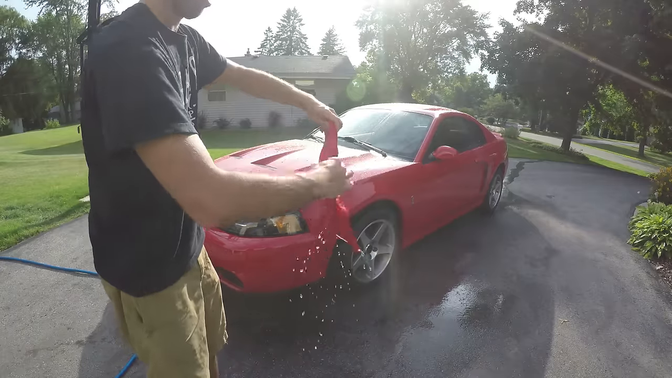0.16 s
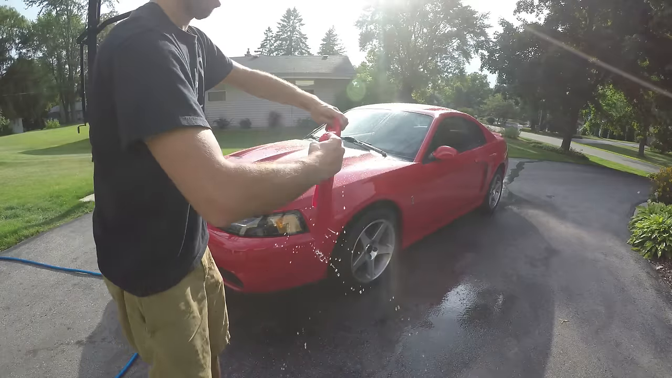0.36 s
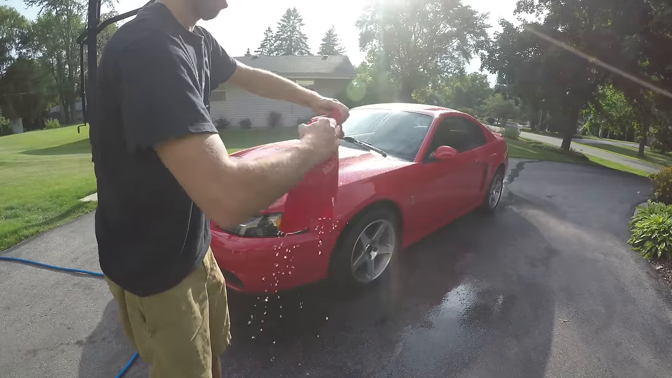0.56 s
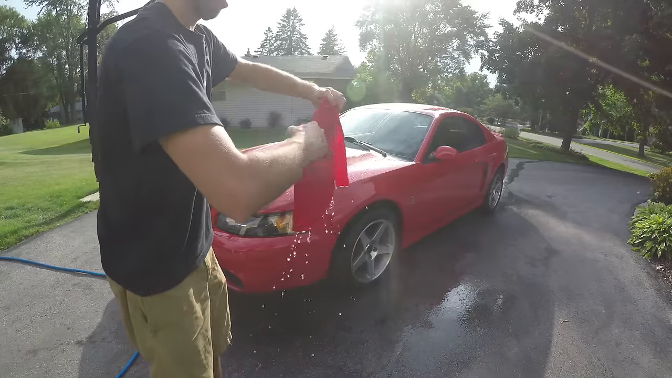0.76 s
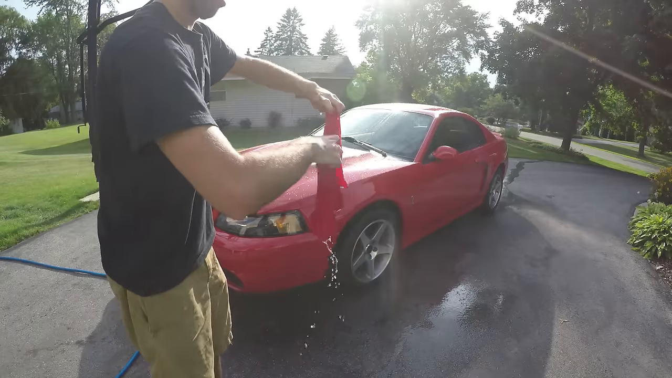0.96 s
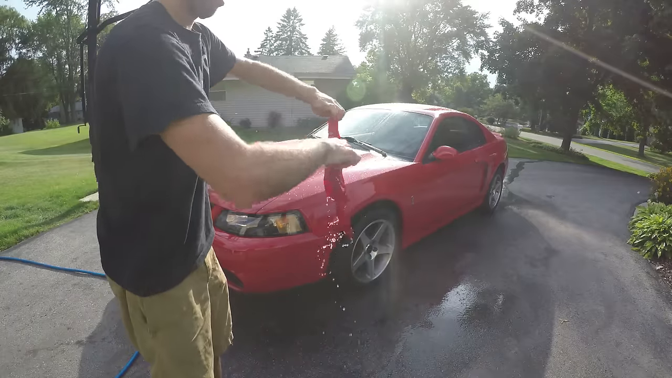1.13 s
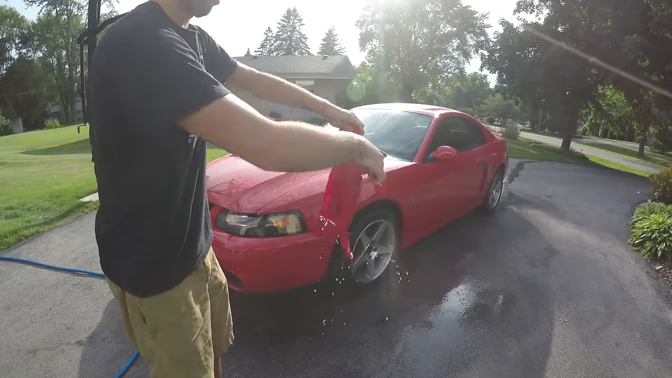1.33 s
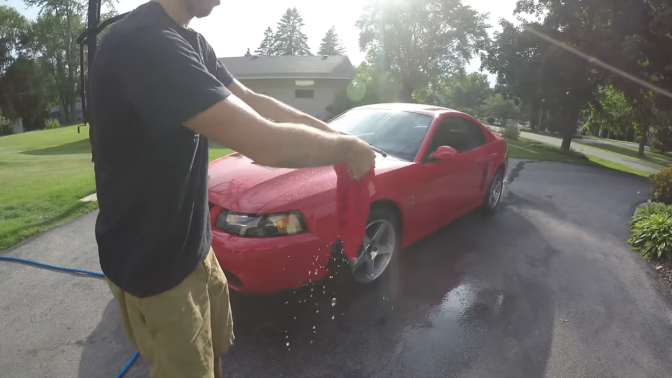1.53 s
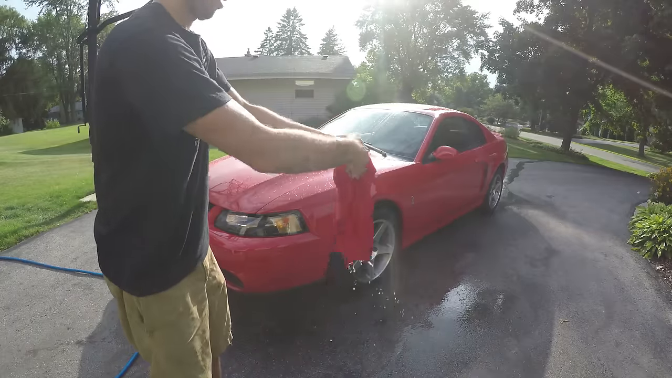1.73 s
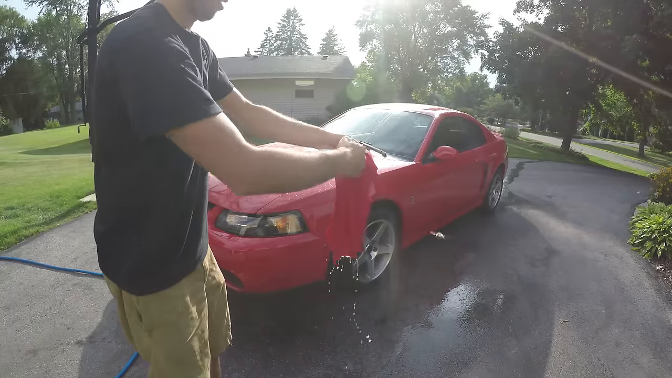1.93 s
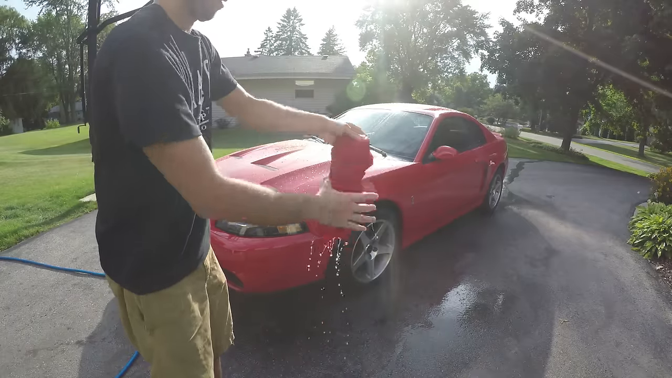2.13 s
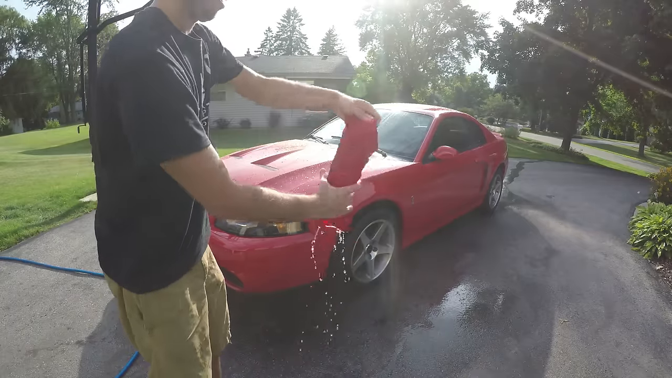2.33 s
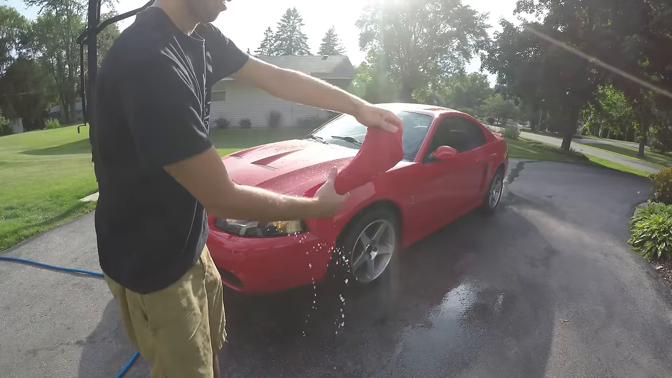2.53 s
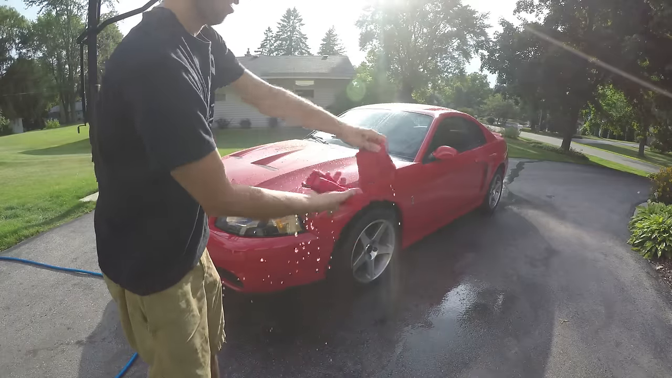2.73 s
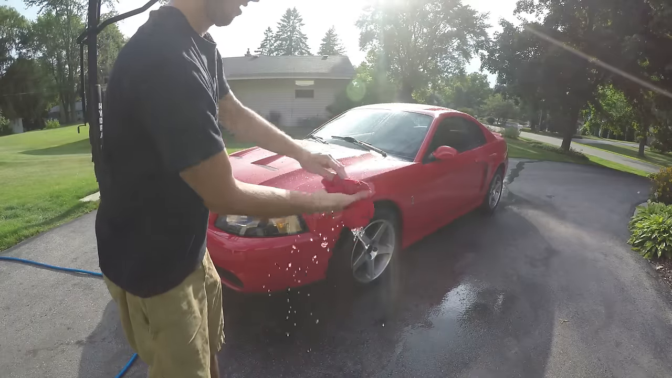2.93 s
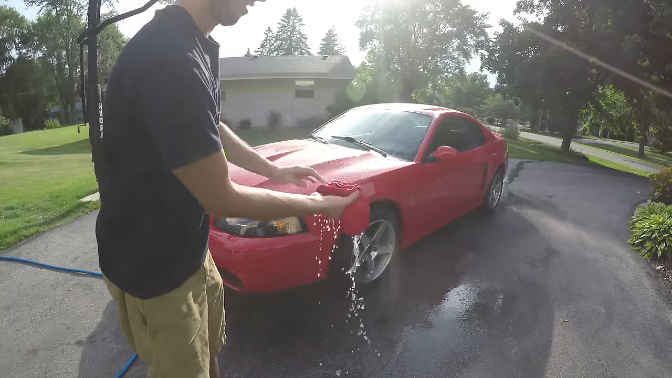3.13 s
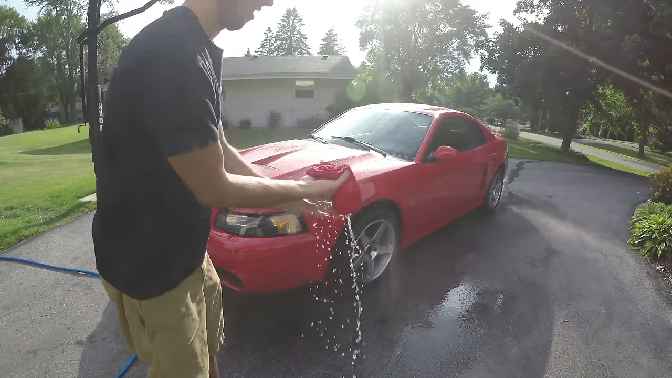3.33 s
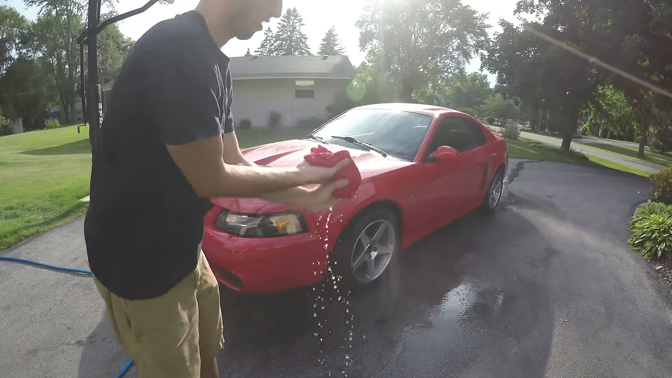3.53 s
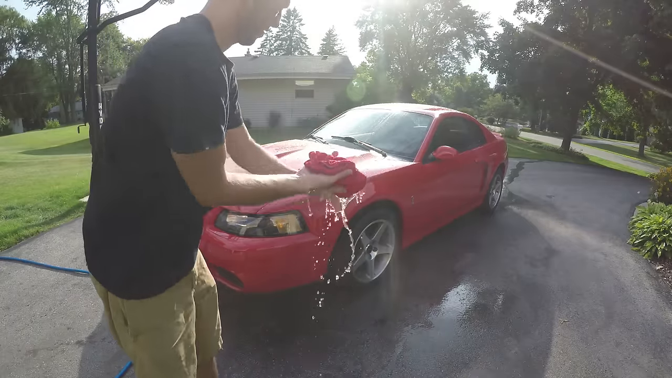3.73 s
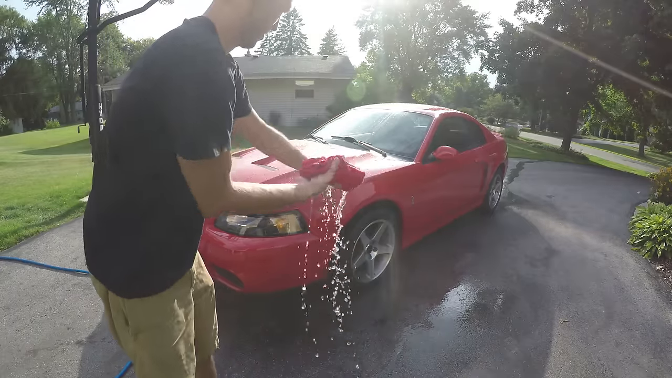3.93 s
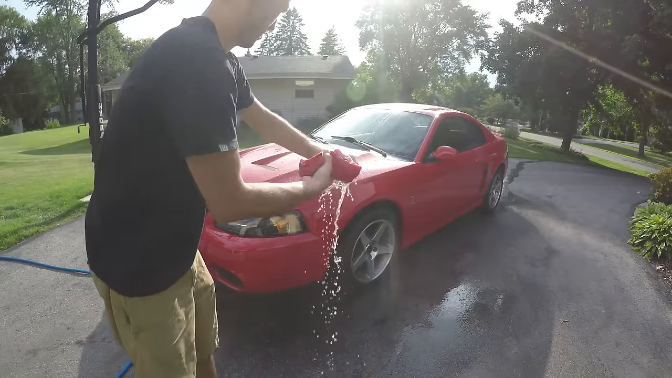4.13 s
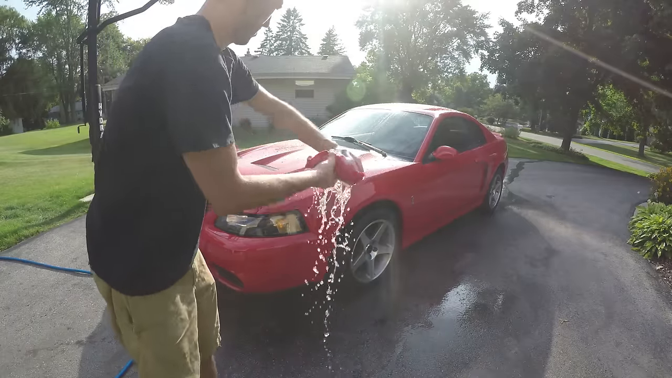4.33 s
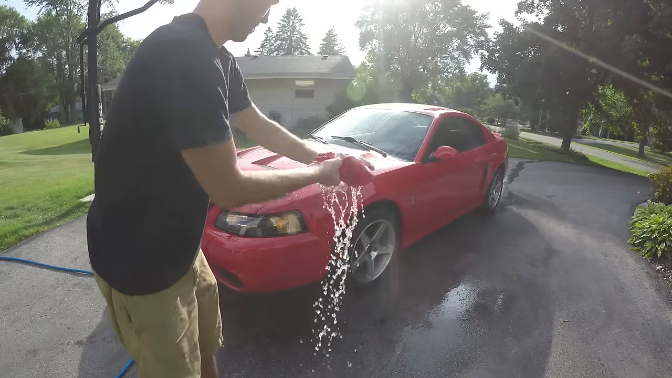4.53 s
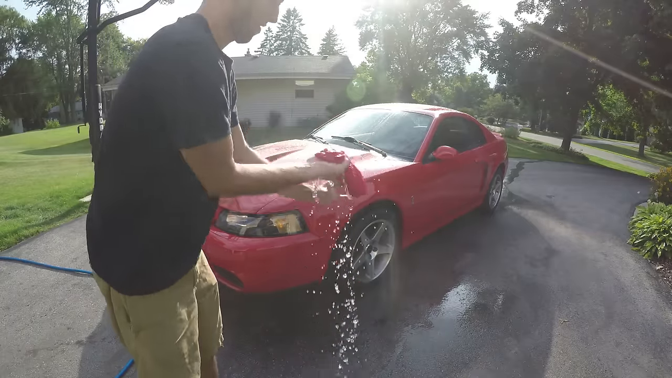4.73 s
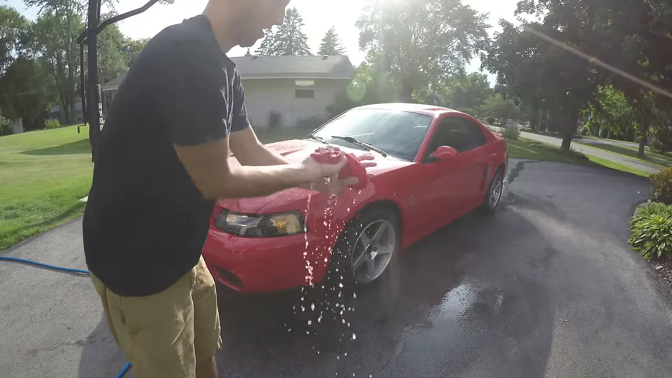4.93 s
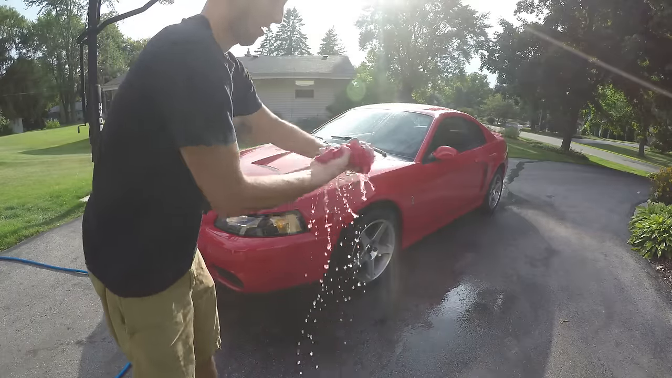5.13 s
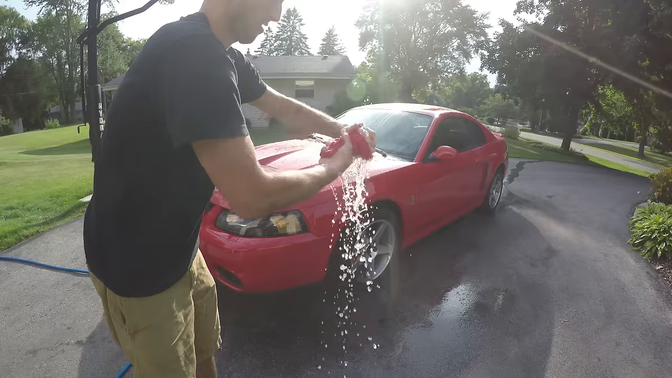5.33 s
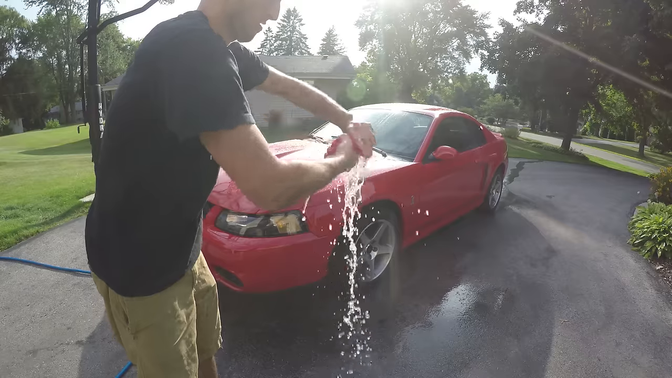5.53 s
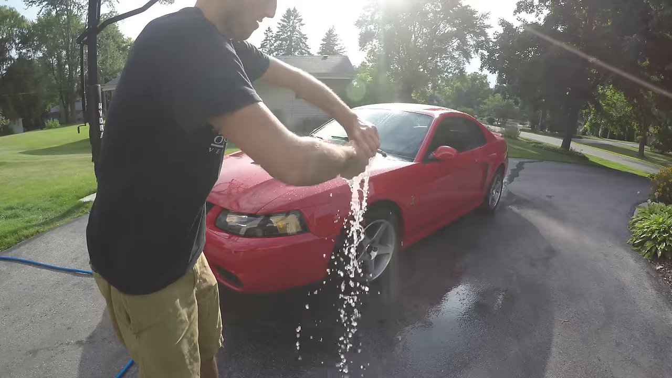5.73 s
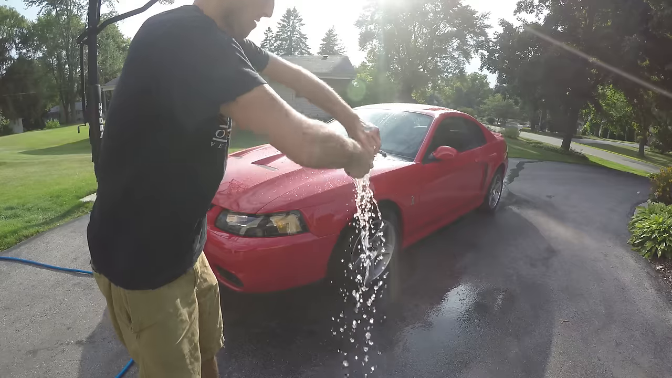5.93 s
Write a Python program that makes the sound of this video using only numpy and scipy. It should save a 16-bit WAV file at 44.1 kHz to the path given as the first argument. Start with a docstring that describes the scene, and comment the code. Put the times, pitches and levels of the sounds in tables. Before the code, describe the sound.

Water wrung from a soaked towel builds from single crisp drips to dense splashing bursts on a wet driveway outdoors.

```python
"""On a wet driveway in a suburb, a soaked towel is wrung out two metres away, with a car just behind.
Drops striking the water film are rising chirps with a spit of filtered-noise spray; trapped bubbles are
decaying rings. Squeezes swell random drops and a fine hiss to a stream, amid cloth squelches. The car flank
and ground return echoes. Far off, two engines of harmonic partials speed up over noise-band drones,
a thin hum, faint chirps, breeze puffs and a suburban murmur of shaped noise."""
import sys
import numpy as np
from scipy import signal
from scipy.fft import rfft, irfft
from scipy.io import wavfile
from scipy.ndimage import uniform_filter1d

SR = 44100
rng = np.random.default_rng(int(sys.argv[2]) if len(sys.argv) > 2 else 0)


def to_wav(sig):
    """Store sig (one row per channel, or 1-D mono) as 16-bit WAV at the path in sys.argv[1].

    Samples outside -1..1 are clipped; the rate is SR.
    """
    pcm = np.clip(np.atleast_2d(sig), -1, 1) * 32767
    pcm = np.round(pcm).astype(np.int16)
    wavfile.write(sys.argv[1], SR, pcm.T)  # frames by channels


N = 263718
T = np.arange(N) / SR  # s
GRAIN = 512  # samples in one drop or bubble

# running water: drive of the full stream and of the steady drip, slopes of a squeeze
FULL_FLOW_DB, DRIP_DB = -45, -72.5
SWELL_DB_PER_S, EBB_DB_PER_S = 137, 98
# loud drops: delay from contact to loudest moment
CONTACT_TO_PEAK_S = 0.001204
# a drop lasts longer the lower it rings (ms at 8 kHz, factor per octave down, random spread in octaves of time)
LENGTH_MS, LENGTH_PER_OCTAVE, LENGTH_SCATTER = .36, 1.3, .3
# spray bands against the band at the ring pitch: level at the reference balance, dB per dB of balance
SPIT_DB, SPIT_PER_TREBLE = -3.0, 1.1  # reference treble 18 dB under the peak
BODY_DB, BODY_PER_LOW = -13.0, 0.89  # reference lows 28 dB under the peak
BUBBLE_T60_S = 0.016
YARD_DB, YARD_T60_S = -12.5, 0.22  # energy of the wash against the direct sound, decay time
MID_DB, SIDE_DB = -60, -58  # suburb before its slow swell: half-sum and half-difference of the ports
LEFT_DB = 1.23  # left port raised and right port lowered by this much
TOP_HZ = 15800  # upper limit of the pickup


def undb(db):
    """Amplitude ratio from decibels: a factor of ten for every 20 dB."""
    return 10 ** (np.asarray(db) / 20)


def level(x, db):
    """Normalization: scales the root-mean-square amplitude to a level in dB."""
    return x * undb(db) / np.sqrt(np.mean(x ** 2, axis=-1, keepdims=True))


def white():
    """Flat spectrum: the transform of uncorrelated Gaussian noise."""
    return rfft(rng.standard_normal(N))


def coloured(spectrum, noise):
    """Spectral shaping: weights a noise transform by (hz, level_db) points, straight in log frequency."""
    hz, db = np.transpose(spectrum)
    f = np.arange(N // 2 + 1) * SR / N + 1e-9
    return irfft(noise * undb(np.interp(np.log(f), np.log(hz), db)), N)


def walk(rate):
    """Slow random modulation: Gaussian levels held 1 / rate s and smoothed twice."""
    k = int(SR / rate)
    steps = np.repeat(rng.standard_normal(N // k + 1), k)
    return uniform_filter1d(uniform_filter1d(steps, k), k)[:N]


def window(start, end, edge=0.018):
    """Amplitude envelope: a linear fade in over one edge and out over two."""
    return np.clip(np.minimum((T - start) / edge, (end - T) / (2 * edge)), 0, 1)


def scatter(s, grains):
    """Superposition: adds one-port or two-port grains at their times."""
    out = np.zeros((2, N + GRAIN))
    starts = np.clip((s * SR).astype(int), 0, N)
    for start, grain in zip(starts, grains):
        out[:, start:start + GRAIN] += grain
    return out[:, :N]


def splashes(s, db, hz, body_db, spit_db, length_ms):
    """Drop impact: the closing crater chirps upward, spray crackles round it and fizzes out."""
    noise = rng.standard_normal(size=(len(s), 3, GRAIN))
    pan_db = 2.5 * rng.standard_normal(len(s))
    t = np.arange(GRAIN) / SR
    rise = 1.6 * np.clip(length_ms, .1, 3)[:, None] / 1000
    x = t / rise
    swell = (x * np.exp(1 - x)) ** 4  # greatest at x = 1
    hz = hz[:, None]
    # pitch climbs from well under the ring pitch and passes it just after the swell peaks
    pitch = np.minimum(hz * (0.3143 + 0.6226 * x), .42 * SR)
    chirp = swell * np.sin(2 * np.pi * np.cumsum(pitch, axis=1) / SR)

    octave = np.log2(np.arange(1, GRAIN // 2 + 2) * SR / GRAIN)

    def bump(centre_hz, width_octaves):
        """Resonance-like band: a Gaussian hump in log frequency."""
        return np.exp(-.5 * ((octave - np.log2(centre_hz)) / width_octaves) ** 2)

    body = undb(body_db)[:, None] * bump(3080, 0.8)
    spit = undb(spit_db)[:, None] * bump(12040, 0.37)
    colour = bump(hz, 0.71) + body + spit
    fizz = undb(-13) * np.exp(-t / .0045)
    # the spray comes late in the rise, once the crown breaks up
    shape = swell * np.minimum(x, 1) ** 2 + fizz * np.minimum(x, 1) ** 3
    spray = level(irfft(rfft(noise) * colour[:, None], GRAIN), -1) * shape[:, None]
    # one spray is common to both ports, the other two belong to one port each
    ports = (1.13 * chirp + spray[:, 0])[:, None] + 0.78 * spray[:, 1:]
    ports = ports / np.abs(ports.mean(axis=1)).max(axis=1)[:, None, None]
    port_db = db[:, None] + np.outer(pan_db, [.5, -.5])
    return scatter(s - rise[:, 0], ports * undb(port_db)[..., None])


def loud_drops():
    """Scaling of impact sound: among drops that stand out singly, a lower ring lasts longer."""
    # drops before panning, low cut and echoes: contact_s, peak_db, ring_hz,
    # treble_db (balance above 10 kHz, re peak), low_db (balance below 3 kHz, re peak)
    drops = [(0.022, -40, 10950, -18, -29), (0.0638, -44, 9300, -3, -28), (0.1555, -36, 7260, -2, -40),
             (0.168, -45.5, 6000, -23, -28), (0.2354, -43, 10100, -5, -28), (0.3057, -44, 10700, -6, -33),
             (0.375, -43.5, 9930, -14, -30), (0.5235, -39.5, 7060, -20, -37), (0.5618, -42, 9350, -18, -27),
             (0.5759, -28, 7770, -25, -28), (0.8604, -40.5, 8980, -14, -31), (1.0877, -39, 7600, -19, -16),
             (1.1055, -35.5, 3640, -10, -25), (1.154, -28, 10000, -11, -43), (1.2, -42, 12500, -11, -22),
             (1.2159, -30.5, 8100, -27, -31), (1.386, -42, 11050, -28, -16), (1.471, -26.5, 9900, -19, -35),
             (1.5259, -36, 8100, -5, -37), (1.6357, -36, 10230, -14, -29), (1.728, -33, 13400, -16, -32),
             (1.7679, -44, 8500, -20, -28), (1.8128, -32.5, 8720, -12, -9), (1.8467, -33, 2660, -18, -13),
             (2.0547, -42, 11400, -11, -24), (2.172, -37, 11500, -30, -33), (2.4568, -46, 8110, -3, -13),
             (2.4919, -22.5, 7750, -27, -29), (2.545, -38, 10100, -21, -32), (2.6359, -41, 7800, -4, -29),
             (2.6743, -37, 7600, -11, -33), (2.7012, -28, 6740, -20, -37),
             (2.7461, -20.5, 7170, -49, -20.5), (2.812, -30, 6310, -37, -31),
             (2.8736, -34.5, 7700, -10, -31), (2.8966, -28, 5600, -24, -27), (3.0789, -34.5, 9400, -7, -38),
             (3.1368, -28.5, 8950, -9, -45), (3.1524, -35, 13000, -16, -30), (3.2129, -34, 8640, -5, -38),
             (3.2314, -29, 5730, -19, -25), (3.2385, -25, 10200, -17, -32), (3.3084, -28, 5410, -29, -25),
             (3.3682, -27, 5900, -20, -31), (3.3917, -33, 4660, -7, -15), (3.4248, -31, 3460, -24, -20),
             (3.438, -32, 4310, -5, -35), (3.4635, -44, 7600, -9, -33), (3.479, -35, 11000, -10, -40),
             (3.501, -29, 8350, -6, -27), (3.5091, -20, 6700, -17, -31), (3.5144, -22.5, 8400, -15, -29),
             (3.5384, -24.5, 7400, -27, -33), (3.5592, -27, 8550, -25, -26),
             (3.5833, -25.5, 7000, -31, -28), (3.612, -25.5, 5750, -19, -44), (3.6975, -30, 8440, -19, -24),
             (3.7144, -19, 8100, -11.5, -35), (3.7264, -25, 12000, -7, -37), (3.7538, -25, 8240, -16, -36),
             (3.7735, -14, 14150, -9, -44), (3.9046, -30, 8450, -23, -37), (3.9154, -32, 4520, -16, -28),
             (3.9825, -39, 5370, -29, -26), (4.0417, -46, 6550, -14, -32), (4.0582, -34.5, 8480, -12, -33),
             (4.0988, -33, 3800, -11, -23), (4.1137, -30.5, 3700, -16, -16), (4.13, -31, 4000, -21, -19),
             (4.1466, -27, 7410, -2, -20), (4.1802, -19, 10340, -22, -27), (4.2034, -20, 5050, -25, -22),
             (4.2231, -20, 6470, -29, -29), (4.252, -26, 4180, -18, -16), (4.2761, -20.5, 3070, -14, -24),
             (4.3032, -21.5, 5560, -11, -30), (4.369, -24, 8740, -19, -25), (4.4056, -27, 3700, -15, -24),
             (4.4553, -29, 12700, -15, -31), (4.4847, -29, 6850, -17, -34), (4.5088, -27, 6980, -30, -21),
             (4.5183, -26, 2400, -10, -8), (4.594, -26, 12900, -15, -24), (4.643, -22, 7100, -27, -23),
             (4.6593, -24.5, 8270, -22, -30), (4.6813, -21, 9630, -8, -33), (4.6972, -22, 8100, -8, -24),
             (4.712, -22.5, 3480, -17, -18), (4.7302, -21.5, 7510, -14, -26), (4.7394, -27, 3640, -15, -21),
             (4.7661, -20.5, 9850, -25, -27), (4.817, -31, 3205, -16, -19), (4.8325, -23, 3520, -14, -21),
             (4.8565, -18.5, 6730, -16, -30), (4.8734, -22.5, 8130, -20, -27),
             (4.8903, -24.5, 11000, -18, -8), (4.9102, -21.5, 2740, -19, -11),
             (4.9254, -27, 10900, -10, -24), (4.9554, -21, 4140, -19, -25), (4.97, -19, 7040, -34, -30),
             (4.9895, -21.5, 10600, -14, -13), (5.018, -23, 2800, -15, -18), (5.0304, -21, 9560, -15, -23),
             (5.088, -28, 4300, -12, -33), (5.1357, -26.5, 10300, -12, -30), (5.1728, -31, 6620, -20, -26),
             (5.1894, -24.5, 9800, -22, -36), (5.22, -22, 11700, -10, -28), (5.2528, -26, 6880, -19, -33),
             (5.2952, -27.5, 5270, -15, -18), (5.3227, -15.5, 9970, -20, -35),
             (5.4181, -31.5, 10160, -12, -27), (5.4424, -27, 6650, -8, -40), (5.46, -27, 11900, -15, -37),
             (5.5117, -26, 7300, -17, -25), (5.5563, -28, 8790, -17, -21), (5.5856, -30.5, 8450, -2, -23),
             (5.6166, -21.5, 9660, -20, -26), (5.6336, -26, 3100, -7, -20), (5.6792, -19, 4300, -16, -15),
             (5.694, -18.5, 9900, -23, -31), (5.7076, -23, 7890, -24, -34), (5.7312, -23, 6650, -14, -22),
             (5.7663, -25, 3450, -20, -22), (5.7763, -21.5, 10940, -15, -14),
             (5.803, -20.5, 8600, -22, -24), (5.817, -23, 8420, -20, -29), (5.8378, -25, 5120, -14, -22),
             (5.8503, -20, 4240, -11, -12), (5.8644, -12.5, 11500, -26, -26),
             (5.8887, -16.5, 4470, -15, -30), (5.912, -21, 5770, -13, -30), (5.9504, -13.5, 7950, -22, -32),
             (5.9674, -12.5, 6900, -26, -24)]
    s, db, hz, treble_db, low_db = np.transpose(drops)
    octaves = np.log2(hz / 8000)
    body_db = BODY_DB + BODY_PER_LOW * (low_db + 28)
    spit_db = SPIT_DB + SPIT_PER_TREBLE * (treble_db + 18)
    spread = 2 ** (LENGTH_SCATTER * rng.standard_normal(len(s)))
    length_ms = LENGTH_MS * LENGTH_PER_OCTAVE ** -octaves * spread
    return splashes(s + CONTACT_TO_PEAK_S, db, hz, body_db, spit_db, length_ms)


def flow(s):
    """Piecewise-linear drive in dB: each squeeze swells, holds and ebbs over a steady drip."""
    # squeezes of the towel: full_s (stream is full), hold_s, stream_db (drive)
    squeezes = [(0.606, 0.37, -68), (1.792, 0.065, -62), (2.5, 0.06, -65.5), (2.946, .05, -59),
                (3.404, 0.45, -54.5), (3.957, 0.16, -59.5), (4.204, .1, -46.5), (4.42, .15, -53),
                (4.692, 0.23, -42), (5.037, 0.23, -50.5), (5.45, 0.096, -53.5), (5.678, .4, -42)]
    full, hold, db = np.transpose(squeezes)[..., None]
    swell_db = SWELL_DB_PER_S * np.maximum(full - s, 0)
    ebb_db = EBB_DB_PER_S * np.maximum(s - full - hold, 0)
    stream_db = db - swell_db - ebb_db
    return np.maximum(stream_db.max(axis=0), DRIP_DB)


def strength(flow_db):
    """Compressive power law: share of the full stream, 0.05 to 1, from its drive."""
    return np.clip(undb(0.32 * (flow_db - FULL_FLOW_DB)), .05, 1)


def patter(count=3400):
    """Random superposition of small drops: a stronger flow lands more of them and thicker ones."""
    when, size, ring, body, spit, length, keep = rng.random(size=(count, 7)).T
    s = when * N / SR
    flow_db = flow(s)
    share = strength(flow_db)
    lands = np.clip((share - keep) / 0.14, 1e-4, 1)  # drops the flow cannot feed are all but silenced
    size_db = -5.27 * np.log(size + 0.045)
    db = flow_db + 3.0 - 10 * np.log10(share) + size_db + 20 * np.log10(lands)
    hz = 13500 * 2 ** (-(1.104 + 1.125 * share) * ring)
    body_db = -18.5 + 9 * share + 12 * (body - .5)
    spit_db = 6.5 + 8 * (spit - .5)
    return splashes(s, db, hz, body_db, spit_db, .25 + .7 * length)


def mist():
    """Partly coherent noise: droplets too fine to tell apart make a flickering hiss that follows the flow."""
    # hz, level_db
    band = [(700, -6.5), (1200, 3.0), (2000, -1.0), (3500, 7.5), (8000, 1.5), (12000, 5), (17000, -3.5)]
    shared = white()
    hiss = np.array([coloured(band, shared + 0.95 * white()) for port in "LR"])
    flow_db = flow(T)
    return level(hiss, -11.0) * strength(flow_db) * undb(flow_db + 3.6 * walk(60))


def bubbles(s, db, hz, t60):
    """Volume resonance: short ragged rings that glide up as the bubble nears the surface."""
    t = np.arange(GRAIN) / SR
    hz, t60 = hz[:, None], np.clip(t60, .004, .04)[:, None]
    ragged = 1 + 2.35 * uniform_filter1d(rng.standard_normal(size=(len(s), GRAIN)), size=24)
    decay = np.exp(-np.log(1000) * t / t60)
    ring = np.sin(2 * np.pi * hz * (0.892 * t + 0.36 * t ** 2 / t60)) * decay
    edges = np.minimum(t / 0.0009, 1) * np.minimum((t[-1] - t) / 0.0026, 1)
    ring = undb(db)[:, None] * ragged * ring * edges
    return scatter(s, ring[:, None])


def trapped_bubbles():
    """Bubble entrainment: thick drops carry air under, and it rings."""
    # bubbles: start_s, level_db (before raggedness and decay), ring_hz (nominal, before the glide)
    trapped = [(1.1044, -46, 3470), (1.8133, -53, 1660), (1.847, -37.5, 2710), (2.0108, -50.5, 2630),
               (2.9882, -39.5, 2740), (3.01, -39.5, 2220), (3.4258, -40, 3450), (4.277, -27, 3200),
               (4.5188, -34.5, 2190), (4.605, -45, 2630), (4.712, -26.5, 3520), (4.7387, -38, 3030),
               (4.9111, -30, 2750), (5.018, -42, 2580), (5.3994, -49.5, 1772), (5.5585, -40.5, 3010),
               (5.678, -35, 2550), (5.8511, -27.5, 2920)]
    return bubbles(*np.transpose(trapped), np.full(len(trapped), BUBBLE_T60_S))


def froth(count=400):
    """Random bubble population: small bubbles ring where the stream churns the puddle."""
    when, size, pitch = rng.random(size=(count, 3)).T
    s = when * N / SR
    flow_db = flow(s)
    size_db = -6.6 * np.log(size + 0.0093)
    db = flow_db - 13.5 + size_db + 20 * np.log10(strength(flow_db))
    hz = 1500 * 2 ** (1.7 * pitch)
    return bubbles(s, db, hz, 26 / hz)


def squelches():
    """Turbulence noise: broad crackly bursts of water forced through the weave in the hands."""
    # squelches: start_s, length_s, level_db (before the crackle)
    bursts = [(1.695, 0.015, -51), (1.80, 0.02, -66), (2.917, 0.027, -57.5)]
    wet = level(coloured([(300, -28), (700, -4), (2500, -5.5), (6000, -11), (16000, -1.5)], white()), 0)
    gate = sum(undb(db) * window(s, s + length, edge=0.001) for s, length, db in bursts)
    return wet * gate * undb(7.1 * walk(700))


def yard(water):
    """Reflection by convolution: distinct echoes off car and ground, then a short wash from the yard."""
    # echoes: left_delay_ms, right_delay_ms, level_db (re direct sound)
    echoes = [(2.55, 2.1, -5), (5.2, 4.4, -17), (7.6, 6.3, -24)]
    t = np.arange(SR // 4) / SR
    decay = np.exp(-np.log(1000) * t / YARD_T60_S) * np.clip(t / 0.006, 0, 1)
    wash = rng.standard_normal((2, len(t))) * decay
    reply = wash * undb(YARD_DB) / np.sqrt(np.sum(wash ** 2, axis=1, keepdims=True))
    reply[:, 0] = 1  # direct sound
    for left_ms, right_ms, db in echoes:
        reply[[0, 1], [int(left_ms * SR / 1000), int(right_ms * SR / 1000)]] += undb(db)
    return signal.fftconvolve(water, reply, axes=1)[:, :N]


def engine(table):
    """Harmonic series: partials of a far engine or hum, wavering with the air."""
    s, hz, *partials_db = np.transpose(table)
    phase = 2 * np.pi * np.cumsum(np.interp(T, s, hz) * (1 + 0.0056 * walk(12))) / SR
    tone = 0
    for k, db in enumerate(partials_db):
        tone = tone + undb(np.interp(T, s, db) + 2.5 * walk(9)) * np.sin((k + 1) * phase)
    return np.sqrt(2) * tone * window(s[0] - .1, s[-1] + 0.056)


def drone(start, end, hz, width_hz, db):
    """Band-pass filtering: a narrow band of noise that comes and goes."""
    band = signal.butter(2, [hz - width_hz / 2, hz + width_hz / 2], "band", fs=SR, output="sos")
    return level(signal.sosfilt(band, rng.standard_normal(N)), db) * window(start, end)


def far_traffic():
    """Superposition of periodic and narrow-band sources: two vehicles, a hum and drones."""
    # levels in these tables precede the wavering, the fades and the port gains
    # car pulling away, then changing gear: time_s, firing_hz, first_db, second_db, third_db (partials)
    car = [(0, 70.34, -86, -71, -94), (.7, 86, -69.5, -66.5, -92), (1.35, 101, -63, -74, -100),
           (2.1, 115.9, -65.5, -94, -82), (2.7, 129.6, -78, -86, -87), (3.5, 147.8, -65, -74, -77.5),
           (4.2, 163, -57.5, -77, -83), (4.6, 147.2, -60, -82, -89), (5, 136.7, -64.5, -79, -92)]
    # second vehicle gathering speed, easing at the end: time_s, firing_hz, level_db
    van = [(2.7, 94.8, -69), (3.2, 108, -68), (3.6, 120, -67), (4.2, 130.5, -60.5), (5, 136, -62),
           (5.8, 140.4, -64.5), (5.98, 138.4, -61.5)]
    # thin far hum, strongest at its end: time_s, pitch_hz, level_db
    hum = [(.3, 412, -77), (.55, 413, -79.5), (.9, 412, -79.5), (1.4, 412, -80), (1.85, 411, -70)]
    # faint far drones: start_s, end_s, centre_hz, width_hz, level_db
    drones = [(2.8, 4.9, 525, 81, -75.5), (3.3, 3.95, 987, 104, -68.5), (1.3, 2.2, 85, 33.6, -67),
              (2.7, 4.1, 65, 40, -71)]
    return engine(car) + engine(van) + engine(hum) + sum(drone(*row) for row in drones)


def suburb():
    """Partial coherence: traffic hum and leaf hiss reach the ports largely out of step."""
    # half-sum and half-difference of the ports: centre_hz, density_db (per Hz, relative)
    mid_spectrum = [(15, -17), (25, -5.5), (60, 3.5), (121, -2), (288, -16.5), (831, -18.5), (1600, -22),
                    (3230, -33.5), (5500, -38.5), (11300, -62), (15200, -29), (16500, -63)]
    side_spectrum = [(15, -41), (25, 1), (103, -2.5), (182, -5), (304, -14.5), (1010, -11.5), (1830, -22),
                     (2820, -27.5), (7710, -33.5), (11600, -27.5), (15200, -41), (16500, -50)]
    swell = undb(.6 * walk(1.3))
    air = white()
    mid = level(coloured(mid_spectrum, air), MID_DB) * swell
    # part of the difference is the same air, turned in phase
    side_air = np.exp(1.7j) * air + 2.4 * white()
    side = level(coloured(side_spectrum, side_air), SIDE_DB) * swell
    far = far_traffic()
    return np.array([mid + side + 1.87 * far, mid - side - 0.74 * far])


def breeze():
    """Low-frequency wind noise: short rumbles, mostly on the left and inverted on the right."""
    # puffs of breeze, level on the left port: centre_s, spread_s (Gaussian), level_db
    puffs = [(.58, 0.1, -62), (2.91, 0.091, -56), (4.765, .1, -53)]
    rumble = level(coloured([(8, -24), (25, 4), (45, -4), (90, -54)], white()), 0)
    gust = sum(undb(db) * np.exp(-.5 * ((T - s) / spread) ** 2) for s, spread, db in puffs)
    return np.outer([1, -.3], rumble * gust)


def far_chirps():
    """Narrow-band noise heard as pitch: faint high chirps, perhaps a bird."""
    # chirps: start_s, end_s, centre_hz, width_hz, level_db (before the fades)
    chirps = [(0.58, 0.673, 3840, 110, -70.5), (0.686, .76, 3770, 150, -83), (0.78, 0.97, 3950, 200, -77)]
    return sum(drone(*row) for row in chirps)


def scene():
    """Linear superposition: water sounds pass through the yard, the background is added directly."""
    # small drops move too little air to sound below about 1 kHz
    small = signal.butter(2, 1100, "high", fs=SR, output="sos")
    drops = signal.sosfilt(small, loud_drops() + patter())
    rings = trapped_bubbles() + froth()
    water = drops + rings + squelches() + mist()
    return yard(water) + suburb() + breeze() + far_chirps()


def record(dry):
    """Linear filtering: the left port rings near 10 kHz and dips near 13 kHz; both lose the top."""
    ring = signal.lfilter(*signal.iirpeak(9900, 3.0, SR), dry[0])
    left = dry[0] + 0.47 * ring
    dipped = signal.lfilter(*signal.iirnotch(12900, 1.7, SR), left)
    left = 0.2 * left + 0.81 * dipped
    ports = np.array([left * undb(LEFT_DB), dry[1] * undb(-LEFT_DB)])
    return signal.sosfilt(signal.ellip(10, .2, 70, TOP_HZ, fs=SR, output="sos"), ports)


dry = scene()
out = record(dry)
to_wav(out)
```